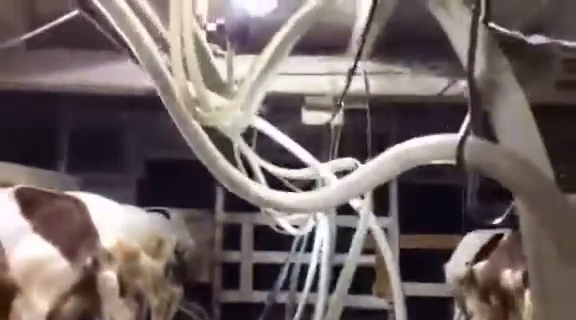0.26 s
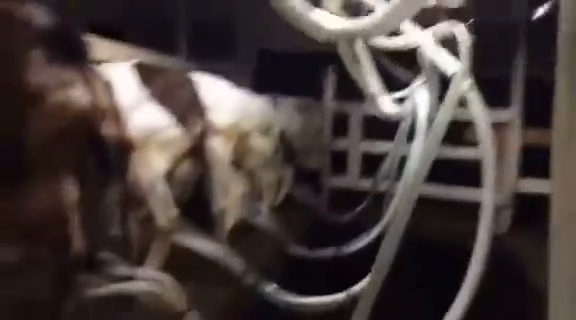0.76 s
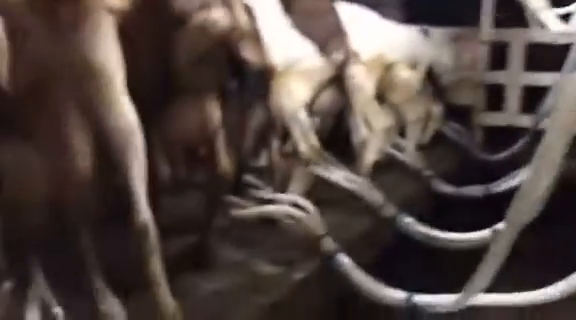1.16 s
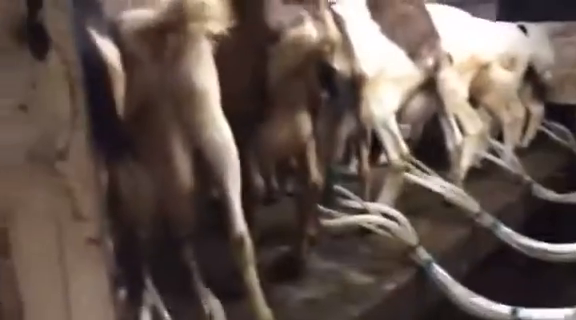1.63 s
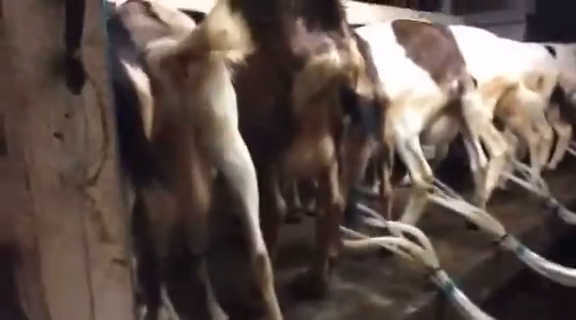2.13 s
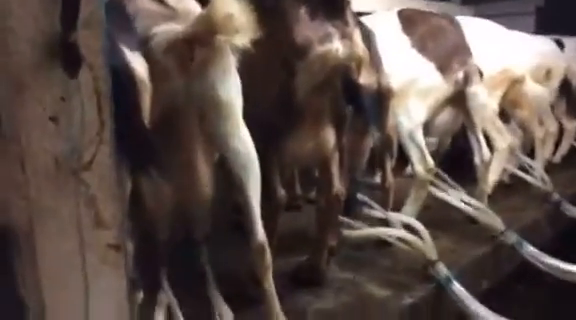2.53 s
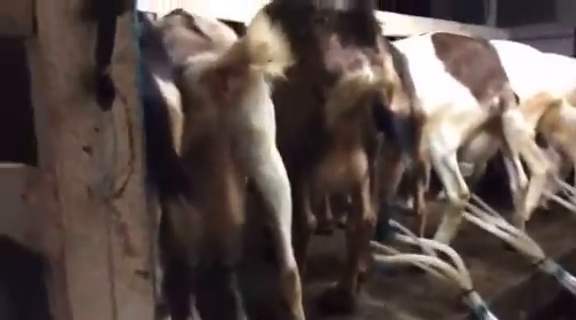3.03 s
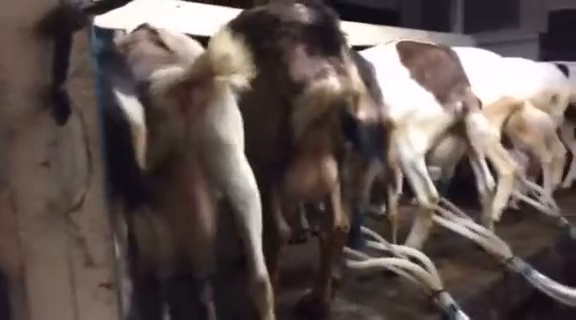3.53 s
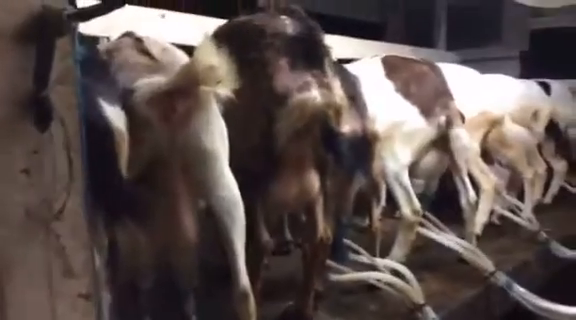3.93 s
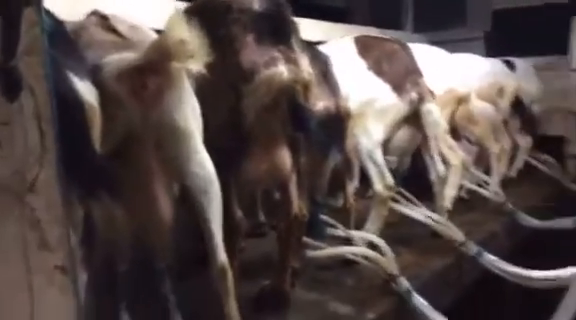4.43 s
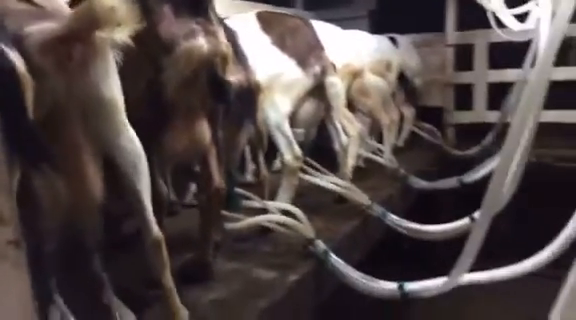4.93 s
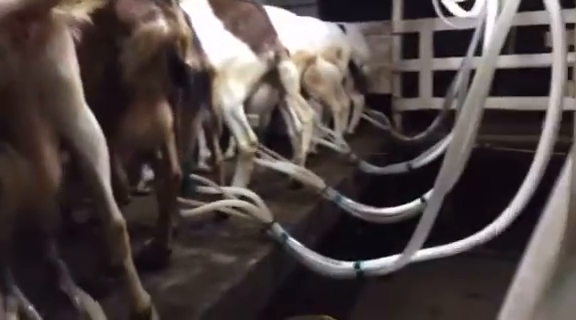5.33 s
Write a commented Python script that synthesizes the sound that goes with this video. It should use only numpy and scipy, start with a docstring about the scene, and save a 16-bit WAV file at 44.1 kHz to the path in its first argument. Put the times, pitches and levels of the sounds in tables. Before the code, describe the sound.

Fast, regular clicking and short air puffs from milking machine valves, with a steady suction hiss and faint pump hum.

```python
"""A goat barn at milking time. The nearest pulsator valve shuttles to and fro five times a second.
On each stroke a pressure difference drives turbulent air through a port; then the slide strikes its seat
and excites the modes of the housing: a sharp tick on opening, a softer, ringing tock on closing.
Four more pulsators run at their own rates down the row, and the barn reverberates briefly with all five.
Behind them are the hiss of leaking air, the hum of the vacuum pump and a few dull bumps in the stalls."""
import sys
import numpy as np
from scipy import signal
from scipy.fft import rfft, irfft, next_fast_len
from scipy.io import wavfile
from scipy.ndimage import uniform_filter1d, map_coordinates

SR = 44100
rng = np.random.default_rng(int(sys.argv[2]) if len(sys.argv) > 2 else 0)


def store_pcm(level_fs):
    """Save levels as 16-bit WAV."""
    pcm = np.round(np.clip(level_fs, -1, 1) * 32767).astype(np.int16)
    wavfile.write(sys.argv[1], SR, np.atleast_2d(pcm).T)


N = 246332

# strokes of the near valve: (time [s], impact level [dB], treble gain [dB], air level [dB])
OPENING_STROKES = [(0.0, -13, -3, -28), (0.201, -14.5, 1.5, -25.4), (0.402, -16, -4, -25),
                   (0.6032, -15, -3.5, -25), (0.8039, -14, 0.5, -27), (1.0047, -15, 0, -26),
                   (1.2052, -14.5, -1.5, -26.5), (1.406, -16.5, -4, -28.5), (1.6068, -15.5, -8.5, -26.5),
                   (1.8077, -15, 1, -27.7), (2.008, -15.5, 3.5, -27.5), (2.2085, -16, 2.5, -27.5),
                   (2.409, -18, 1, -26), (2.6093, -19.5, -2, -24.4), (2.81, -17, -1, -25.5),
                   (3.0098, -16, 6, -29), (3.2104, -18, 0, -24.5), (3.4113, -16.5, -1.5, -28),
                   (3.6123, -15.9, -0.5, -27.5), (3.8129, -16.4, -2, -25), (4.0133, -14, -1.4, -26),
                   (4.2143, -15.9, 0.5, -26.5), (4.4147, -16.5, -2.5, -26.5), (4.6155, -16.5, -3, -26.5),
                   (4.8166, -16, -0.5, -26.5), (5.0176, -16.6, -6, -26.5), (5.2188, -18, -1, -28.7),
                   (5.42, -16.5, 2, -27.5)]
CLOSING_STROKES = [(0.0983, -19.5, 1, -28.5), (0.2995, -18.5, 2.4, -25.5), (0.5001, -18, 4.5, -27),
                   (0.7019, -20, 1.2, -27.5), (0.9019, -20.5, -3, -31), (1.103, -20, 1, -31.5),
                   (1.3038, -20.5, 0, -30.5), (1.5048, -20.6, -3, -29.8), (1.705, -20.9, -4, -31),
                   (1.9055, -20, -2, -28.5), (2.1061, -19, 1.5, -29.5), (2.3067, -18.5, -1.5, -32),
                   (2.5071, -21, 2, -27.5), (2.7075, -18.5, -5, -28.5), (2.9073, -20, 0.5, -33.5),
                   (3.1089, -20.5, -3, -28.5), (3.3085, -19, -12, -28.5), (3.5096, -22.5, -5, -29),
                   (3.7103, -22.5, -2.0, -27), (3.911, -21.5, 2.5, -30.5), (4.1112, -19.5, 0, -29),
                   (4.3124, -23.5, -4, -28.5), (4.513, -20.5, -1, -31.5), (4.714, -19.5, -1, -29),
                   (4.9156, -22, -0.2, -29), (5.1161, -20.9, -2, -31), (5.3175, -20, 3, -31.5),
                   (5.5194, -20, 2, -30)]
# spectra of the opening and closing impacts: (frequency [Hz], level [dB])
TICK_SPECTRUM = [(150, -36), (900, -31), (1250, -24), (1650, -23), (1950, -12), (2650, -7), (3000, 1.3),
                 (3450, -4), (3700, -14), (4200, -11), (6750, -19), (7750, -12), (8750, -23), (10000, -47)]
TOCK_SPECTRUM = [(150, -26), (800, -23), (1200, -12), (1550, -18), (2300, -23), (3000, -10), (3470, 0.5),
                 (3900, -3.5), (4250, -13), (5450, -6), (6150, -10), (6600, -19), (8700, -20), (10000, -56)]
# flow noise of the narrow gap (bright) and the open port (darker): (frequency [Hz], level [dB])
JET_SPECTRUM = [(300, -31), (900, -16.5), (1200, -14), (2200, 0), (3400, -3.5), (4300, 1.5), (5000, 1.5),
                (5900, 6.5), (6600, -3), (8200, -18.5), (9000, -7.5), (10000, -64)]
PORT_SPECTRUM = [(200, -22.5), (800, -26), (1200, -11.5), (1650, -6.5), (2050, -1), (2600, 0.5),
                 (3400, 0.5), (4100, -3), (6000, -2.5), (7000, -4.5), (8500, -5.5), (10000, -44.5)]
def near_pulsator():
    """Flow noise and impact: on each stroke air rushes through gap and port, then the slide seats."""
    open_s, tick_db, tick_treble, in_db = np.transpose(OPENING_STROKES)
    shut_s, tock_db, tock_treble, out_db = np.transpose(CLOSING_STROKES)
    ticks = impacts(open_s, tick_db + 0.18, tick_treble - 0.5, TICK_SPECTRUM,
                    chatter_db=-10, chatter_t60=0.03, bounce_db=-13, bounce_s=0.0036, ring_db=-12.5)
    tocks = impacts(shut_s, tock_db + 0.2, tock_treble, TOCK_SPECTRUM,
                    chatter_db=-5, chatter_t60=0.05, bounce_db=-7.5, bounce_s=0.004, ring_db=-3)
    jet = venting(open_s, in_db, lead=0.039, rise=0.015, t60=0.11)
    jet += venting(shut_s, out_db, lead=0.04, rise=0.01, t60=0.21)
    port = venting(open_s, in_db - 6.5, lead=0.036, rise=0.0095, t60=0.12, hold=0.03)
    port += venting(shut_s, out_db - 8.5, lead=0.04, rise=0.0068, t60=0.17, hold=0.019)
    jet *= turbulence(JET_SPECTRUM, patchy_db=3.5)
    port *= turbulence(PORT_SPECTRUM, patchy_db=3.5)
    flutter = amp(0.4 * wobble(250) + 1.3 * wobble(1200))  # eddies make the flow spit
    return ticks + tocks + (jet + port) * flutter


# modes of the valve housing: (frequency [Hz], level [dB], decay time T60 [s])
HOUSING_MODES = [(475, .5, 0.09), (1120, 4, 0.06), (1424, 1.5, 0.13), (3030, -13, 0.07), (3410, -2, 0.13),
                 (3600, .5, 0.11), (3830, 0, 0.11), (4080, -3.5, 0.2), (5450, 2, 0.035)]
def impacts(times, levels_db, trebles_db, spectrum,
            chatter_db, chatter_t60, bounce_db, bounce_s, ring_db):
    """Impact excitation: the slide hits its seat, chatters, bounces once and rings the housing."""
    track, t = np.zeros(N), np.arange(SR // 8) / SR
    treble_hz = 4000
    rms_scale = np.sqrt(0.0035 * SR)  # a click's level is its rms over 3.5 ms
    # the chatter builds up only after the first clean contact
    chatter = amp(-60 * t / chatter_t60) * (1 - np.exp(-(t / 0.0025) ** 2))
    # a mode rings as strongly as the impact's spectrum feeds it
    modes = [(hz, amp(db + along(spectrum, hz) - 60 * t / t60)) for hz, db, t60 in HOUSING_MODES]
    for s, db, treble_db in zip(times, levels_db, trebles_db):
        force = amp(chatter_db) * unit_energy(rng.standard_normal(len(t)) * chatter)
        force[0] += 1
        bounce_at = int(bounce_s * SR * rng.uniform(0.85, 1.15))
        force[bounce_at] += amp(bounce_db + rng.normal(0, 2))
        body = minimum_phase([(hz, level + treble_db * (hz > treble_hz)) for hz, level in spectrum])
        click = unit_energy(signal.fftconvolve(force, body)[:len(t)])
        ring = np.zeros(len(t))
        for hz, decay in modes:
            strength, detune = amp(rng.normal(0, 2.9)), rng.normal(1, 0.0044)
            ring += strength * decay * np.sin(2 * np.pi * (hz * detune * t + rng.random()))
        add(track, s, rms_scale * amp(db) * (click + amp(ring_db) * unit_energy(ring)))
    return track


def venting(times, levels_db, lead, rise, t60, hold=0):
    """Pressure equalisation: the flow envelope rises lead seconds before each impact, then decays."""
    track, t = np.zeros(N + SR), np.arange(SR // 4) / SR  # a spare second in front for early flow
    opening = np.sin(np.pi / 2 * np.minimum(t / rise, 1)) ** 2
    flow = opening * amp(-60 * np.maximum(t - rise - hold, 0) / t60)
    for s, db in zip(times, levels_db):
        add(track, 1 + s - lead + rng.normal(0, 0.0012), amp(db) * flow)
    return track[SR:]


def turbulence(spectrum, patchy_db):
    """Turbulent flow: broadband noise of rms 1 whose spectrum fluctuates from moment to moment."""
    spectrogram = signal.stft(noise(spectrum), nperseg=512)[2]
    patches = uniform_filter1d(rng.standard_normal(spectrogram.shape), size=5, axis=0)
    patches = unit_rms(uniform_filter1d(patches, size=7, axis=1))
    return unit_rms(signal.istft(spectrogram * amp(patchy_db * patches), nperseg=512)[1][:N])


# cycles of the pulsators down the row: (period [s])
FAR_PERIODS = [.2396, .388, .2664, .3218]
# their strokes: (first opening [s], first closing [s], tick level [dB], tock level [dB],
# opening air level [dB], closing air level [dB], air lead [s], air T60 [s], chatter level [dB])
FAR_VALVES = [(.063, .181, -29, -26.5, -35.5, -36.5, 0.054, 0.27, 10),
              (.374, .204, -27.5, -28, -36.5, -41.5, .05, 0.11, 3.5),
              (.26, .114, -34, -27, -30, -33, 0.0597, 0.12, 9.5),
              (.236, .111, -39, -31.5, -32.5, -35.5, 0.031, 0.19, 6)]
def far_pulsators():
    """Independent oscillators: each valve keeps its own period, so they drift in and out of step."""
    track, scatter_db = np.zeros(N), 1.2
    for period, valve in zip(FAR_PERIODS, FAR_VALVES):
        first_open, first_shut, tick_db, tock_db, in_db, out_db, lead, t60, chatter_db = valve
        cycles = np.arange(0, N / SR, period)
        opens, shuts = first_open + cycles, first_shut + cycles
        open_vary, shut_vary = rng.normal(0, scatter_db, (len(cycles), 2)).T
        track += far_impacts(opens, tick_db + open_vary, TICK_SPECTRUM, chatter_db)
        track += far_impacts(shuts, tock_db + shut_vary, TOCK_SPECTRUM, chatter_db)
        air_db = np.r_[in_db + open_vary, out_db + shut_vary]
        flow = venting(np.r_[opens, shuts], air_db, lead, rise=0.014, t60=t60)
        track += flow * turbulence(PORT_SPECTRUM, patchy_db=3)
    return track


def far_impacts(times, levels_db, spectrum, chatter_db):
    """Propagation over distance: an impact arrives smeared and, on average, duller."""
    trebles_db = rng.normal(-1.2, 2.2, len(times))
    return impacts(times, levels_db, trebles_db, spectrum, chatter_db,
                   chatter_t60=0.06, bounce_db=-5, bounce_s=0.006, ring_db=-6)


# hiss of leaking air: (frequency [Hz], level [dB])
LEAK_SPECTRUM = [(350, -45), (600, -24), (960, -14), (1130, -8), (1430, -9), (1680, -12.5), (1930, -8.5),
                 (2630, -6.5), (3480, 0), (4090, -6), (5780, -6), (6950, -9.5), (7900, -16), (9070, -20),
                 (10000, -50)]
# steady air intake: (time [s], level [dB])
INTAKE_LEVELS = [(0.0, -34), (0.702, -33), (1.8, -32), (3.2, -32), (5.5, -33)]
# brief lulls and swells of the hiss: (time [s], half width [s], gain [dB])
HISS_SWELLS = [(.03, 0.021, -2), (.36, .012, -3), (.845, 0.028, -3.5), (.955, 0.013, -5.5),
               (1.03, .02, 3.5), (1.128, 0.01, -8), (1.66, .03, 1), (2.34, 0.023, 3), (2.76, .022, -1.5),
               (2.95, 0.015, 4), (3.26, 0.013, -3), (3.355, 0.017, -4), (3.45, .025, 0.5), (3.57, .025, -1),
               (4.06, .012, -7), (4.175, .015, -2), (4.26, 0.025, 4), (4.54, .025, -0.5), (4.87, 0.012, 3),
               (5.16, .025, -0.5), (5.48, 0.018, 0)]
def leaks():
    """Suction: air drawn in at the teat cups turns turbulent and hisses."""
    t = np.arange(N) / SR
    steady_db = np.interp(t, *np.transpose(INTAKE_LEVELS))
    swells_db = sum(db * np.exp(-((t - s) / width) ** 2) for s, width, db in HISS_SWELLS)
    flicker_db = 0.9 * wobble(30) + wobble(90)
    return amp(steady_db + swells_db + flicker_db) * turbulence(LEAK_SPECTRUM, patchy_db=2.6)


# knocks in the stalls: (time [s], level [dB], frequency [Hz], decay time T60 [s])
STALL_BUMPS = [(.003, -26, 183, 0.085), (0.644, -41.5, 397, 0.22), (1.306, -41, 186, 0.14),
               (1.698, -47, 346, 0.16)]
def bumps():
    """Damped resonance: each soft knock is one low mode, blurred by a wandering phase."""
    track, t = np.zeros(N), np.arange(SR // 4) / SR
    for s, db, hz, t60 in STALL_BUMPS:
        phase = 2 * np.pi * hz * t + 0.42 * wobble(65)[:len(t)]
        envelope = amp(db - 60 * t / t60) * (1 - np.exp(-t / 0.0009))
        add(track, s, envelope * np.sin(phase))
    return track


# tones of the vacuum pump: (frequency [Hz], rms level [dB], fluctuating share of power [0-1])
PUMP_TONES = [(80, -57.5, 0.4), (160.3, -59, .25), (240.5, -62, .25), (481, -69, 0.1), (601.5, -71, 0.1)]
# low rumble: (frequency [Hz], level [dB])
RUMBLE_SPECTRUM = [(20, -30.5), (45, -9.5), (70, 2.5), (90, -2), (115, 4), (145, -1.5), (190, 0), (260, -5),
                   (340, -5.5), (450, -5.5), (700, -7.5), (1200, -14), (2500, -40)]
def vacuum_pump():
    """Random modulation: each tone of the distant pump swells and fades on its own, over a rumble."""
    t, hum = np.arange(N) / SR, np.zeros(N)
    for hz, db, share in PUMP_TONES:
        swell = np.sqrt(2 * (1 - share)) + np.sqrt(share) * (wobble(12) + 1j * wobble(12))
        hum += amp(db) * np.real(swell * np.exp(2j * np.pi * hz * t))
    return hum + amp(-50.5) * noise(RUMBLE_SPECTRUM)


# reverberation of the barn: (frequency [Hz], decay time T60 [s])
BARN_DECAY = [(200, 0.37), (1200, 0.094), (3500, 0.11), (9000, 0.091)]
def barn(x):
    """Diffuse reverberation: a noise tail, longest in the bass, drawn anew every eighth of a second."""
    track, block, delay_s = np.zeros(N), SR // 8, 0.005
    for start in range(0, N, block):
        hz, t, spectrogram = signal.stft(rng.standard_normal(SR // 3), SR, nperseg=256)
        decay = amp(-60 * t / along(BARN_DECAY, hz)[:, None])
        tail = unit_energy(signal.istft(spectrogram * decay, SR, nperseg=256)[1])
        add(track, start / SR + delay_s, signal.fftconvolve(x[start:start + block], tail))
    return track


def amp(db):
    return 10 ** (np.asarray(db) / 20)


def unit_rms(x):
    return x / np.sqrt(np.mean(x ** 2) + 1e-20)


def unit_energy(x):
    return x / np.linalg.norm(x)


def along(points, hz):
    """Interpolation of (frequency [Hz], value) points on a logarithmic frequency axis."""
    frequencies, values = np.transpose(points)
    return np.interp(np.log(hz + 1), np.log(frequencies + 1), values)


def wobble(rate):
    """Spline interpolation: a smooth curve through rate random knots a second."""
    knots = rng.standard_normal(int(N * rate / SR) + 4)
    return map_coordinates(knots, [np.arange(N) * rate / SR])


def filtered(x, response):
    """Linear filtering: the spectrum of x is multiplied by a frequency response."""
    size = next_fast_len(N + SR // 2)
    return irfft(rfft(x, size) * response(np.fft.rfftfreq(size, 1 / SR)), size)[:N]


def noise(spectrum):
    """Spectral shaping: white noise is coloured and scaled to rms 1."""
    return unit_rms(filtered(rng.standard_normal(N), lambda hz: amp(along(spectrum, hz))))


def minimum_phase(spectrum, size=2048):
    """Cepstral folding gives the most compact causal impulse response with this spectrum."""
    cepstrum = irfft(np.log(amp(along(spectrum, np.fft.rfftfreq(size, 1 / SR)))))
    cepstrum[1:size // 2] *= 2
    cepstrum[size // 2 + 1:] = 0
    return irfft(np.exp(rfft(cepstrum)))


def add(track, s, sound):
    """Superposition: a sound is mixed in at s seconds."""
    span = track[max(round(s * SR), 0):][:len(sound)]
    span += sound[:len(span)]


def scene():
    """Direct and diffuse fields add; the far valves are slightly more reverberant than the near one."""
    near, far = near_pulsator(), far_pulsators()
    reverberation = barn(amp(-8.5) * near + amp(-8) * far)
    return (near + far + reverberation + leaks() + vacuum_pump() + bumps())[None]


def record(dry):
    """Soft saturation rounds off the highest peaks; a steep low-pass limits the bandwidth."""
    ceiling, cutoff_hz = 0.8, 9500
    soft = dry[0] / (1 + np.abs(dry[0] / ceiling) ** 4) ** (1 / 4)
    return filtered(soft, lambda hz: 1 / np.sqrt(1 + (hz / cutoff_hz) ** 100))[None]


dry = scene()
out = record(dry)
store_pcm(out)
```